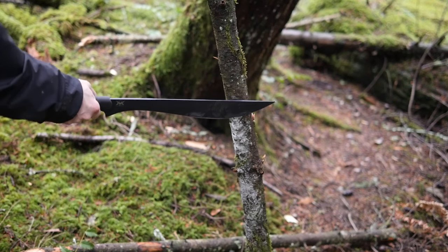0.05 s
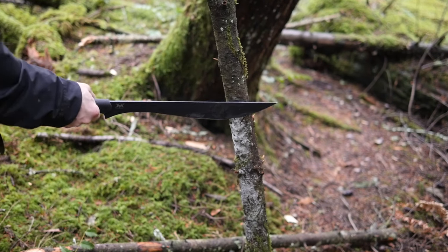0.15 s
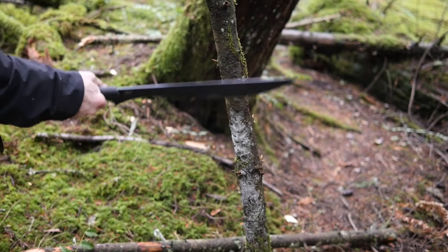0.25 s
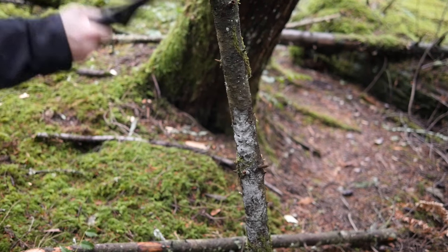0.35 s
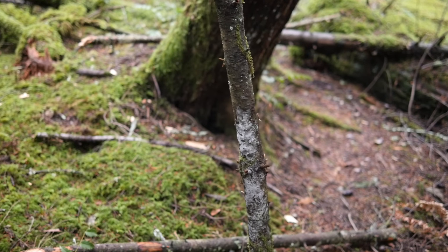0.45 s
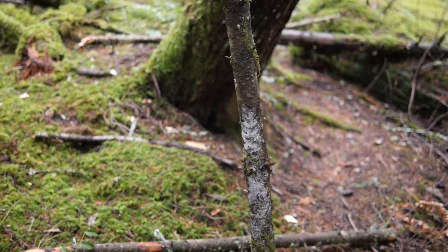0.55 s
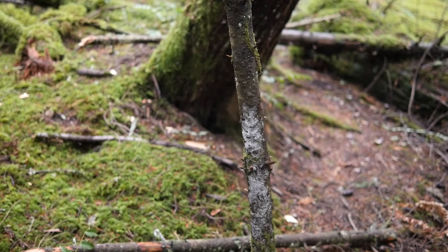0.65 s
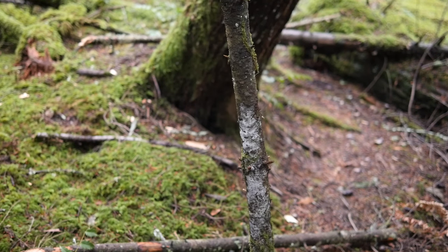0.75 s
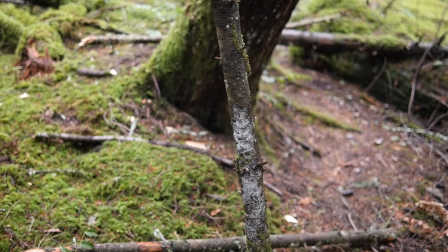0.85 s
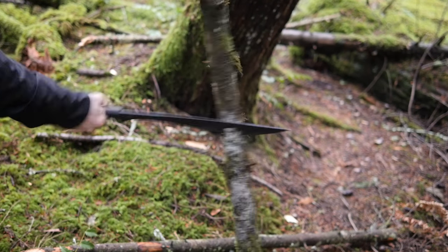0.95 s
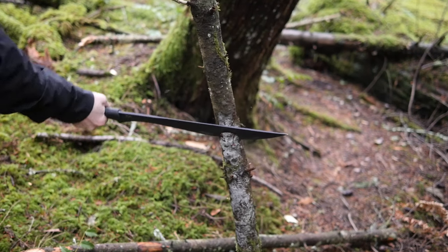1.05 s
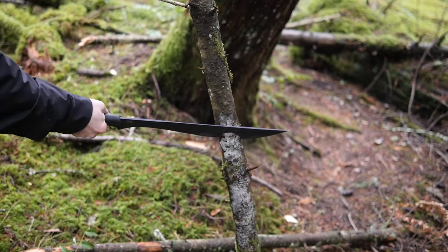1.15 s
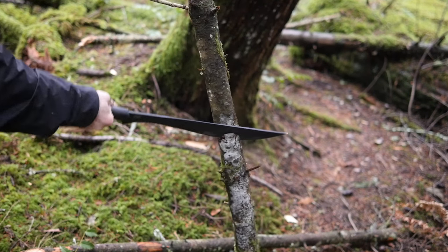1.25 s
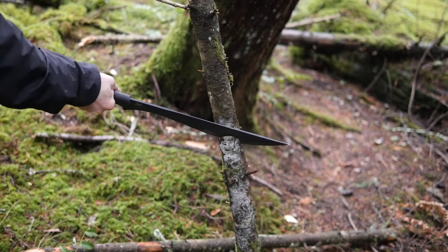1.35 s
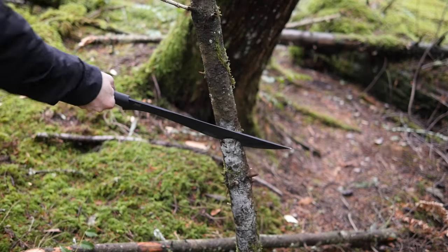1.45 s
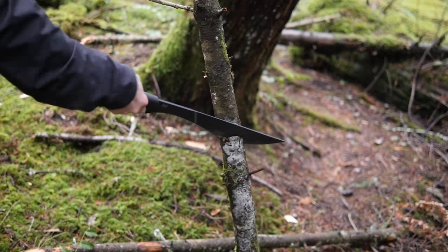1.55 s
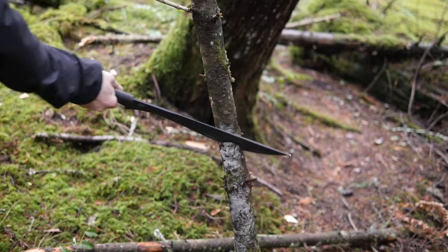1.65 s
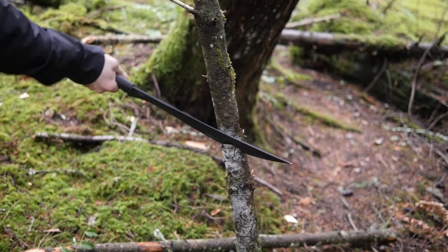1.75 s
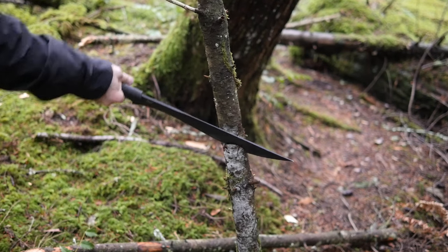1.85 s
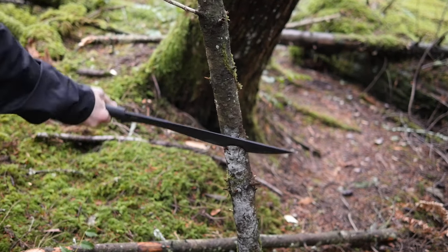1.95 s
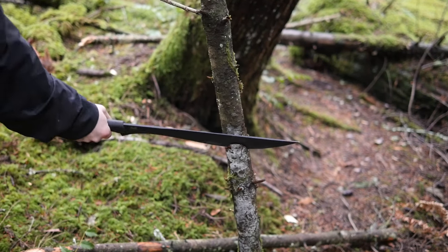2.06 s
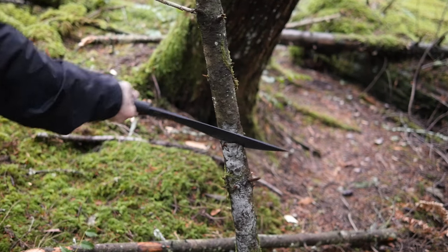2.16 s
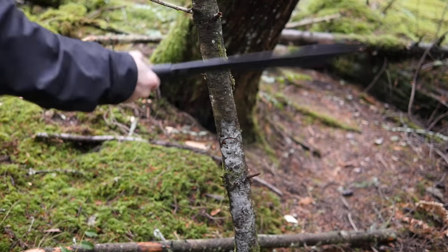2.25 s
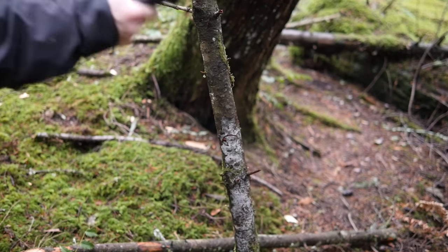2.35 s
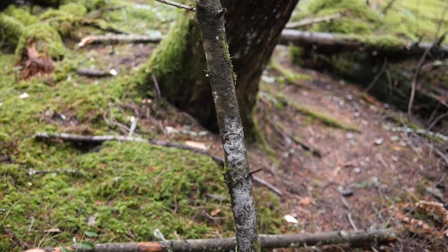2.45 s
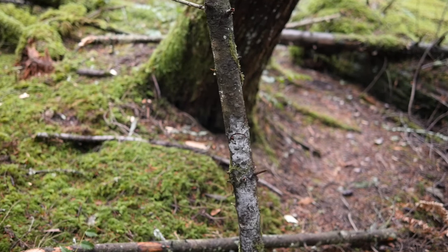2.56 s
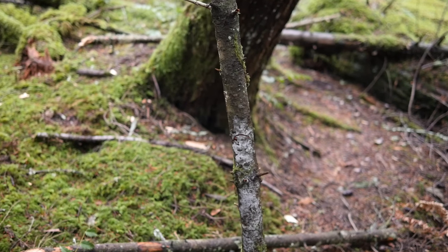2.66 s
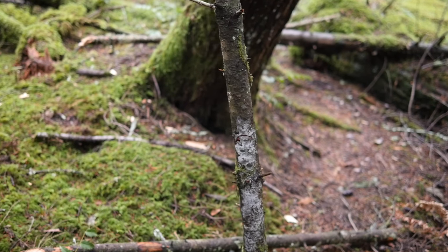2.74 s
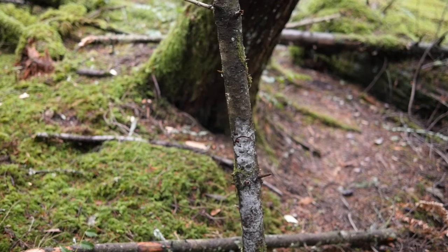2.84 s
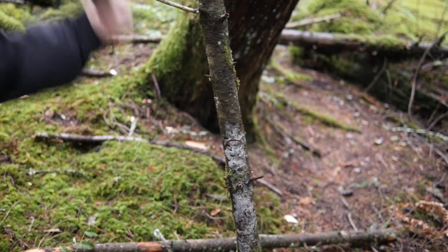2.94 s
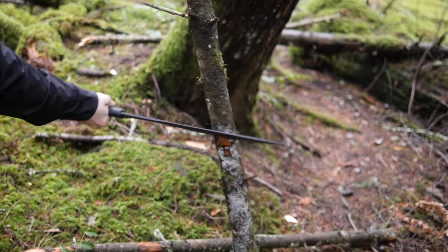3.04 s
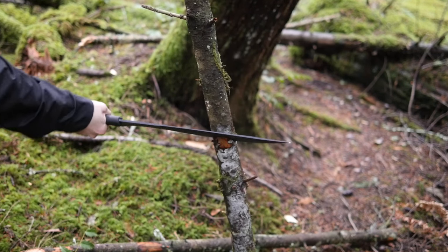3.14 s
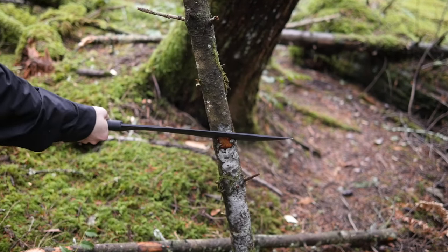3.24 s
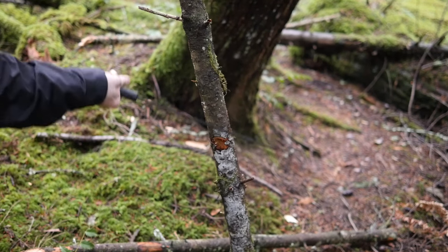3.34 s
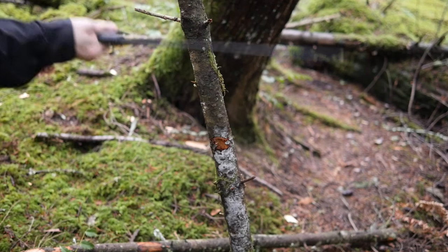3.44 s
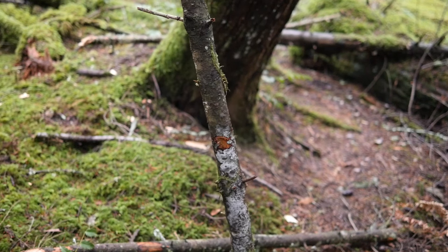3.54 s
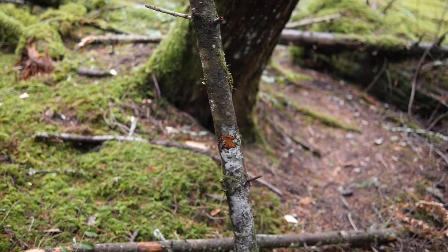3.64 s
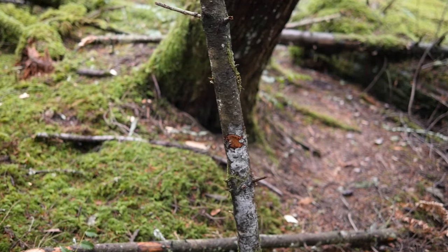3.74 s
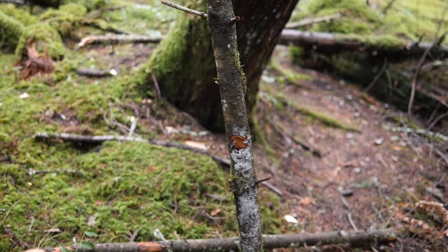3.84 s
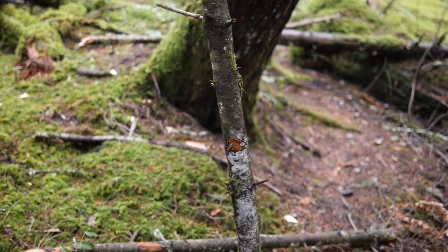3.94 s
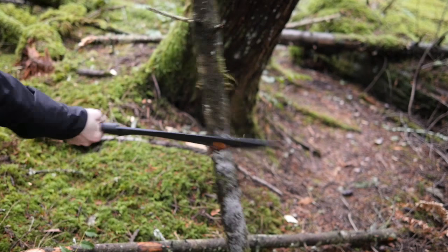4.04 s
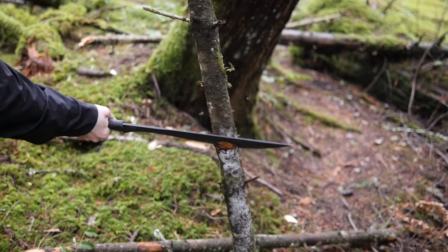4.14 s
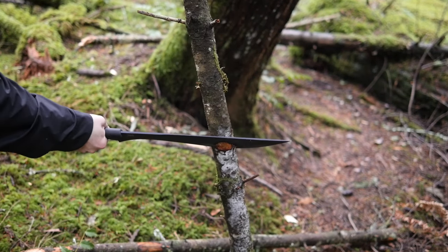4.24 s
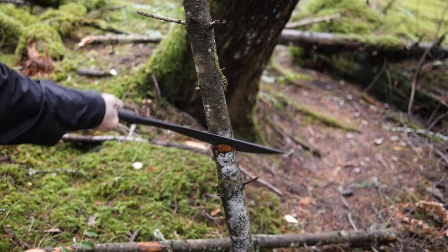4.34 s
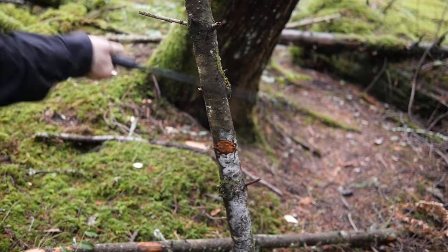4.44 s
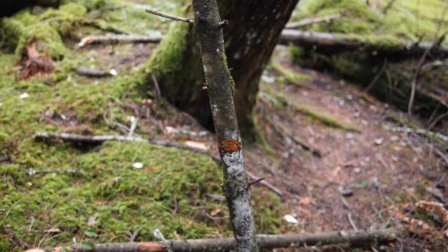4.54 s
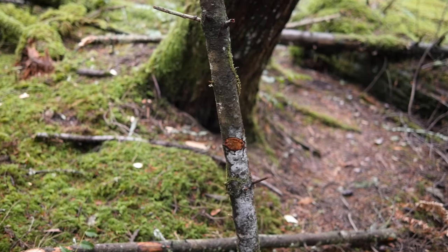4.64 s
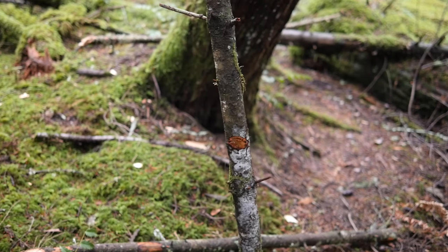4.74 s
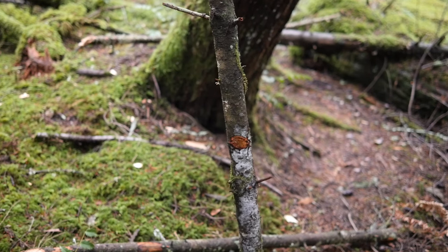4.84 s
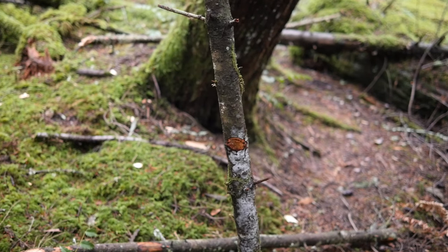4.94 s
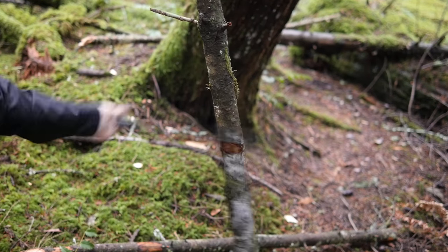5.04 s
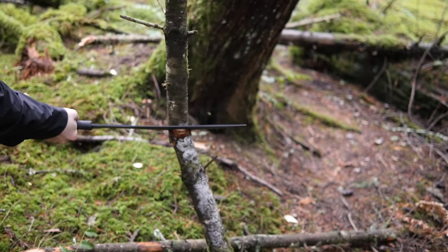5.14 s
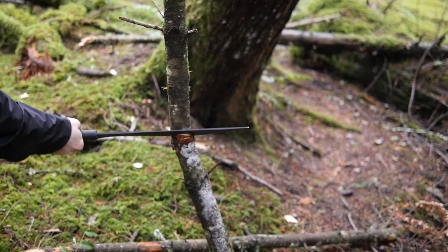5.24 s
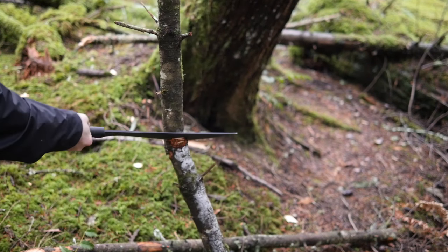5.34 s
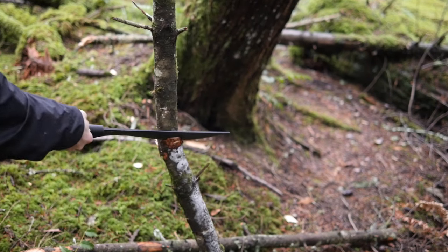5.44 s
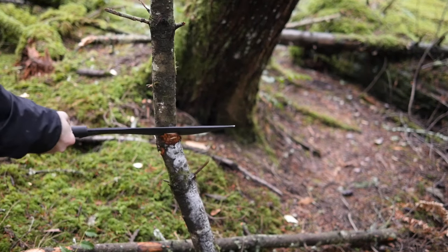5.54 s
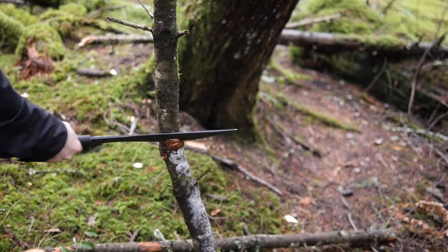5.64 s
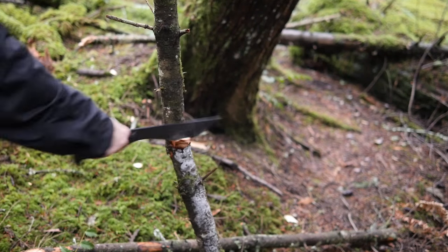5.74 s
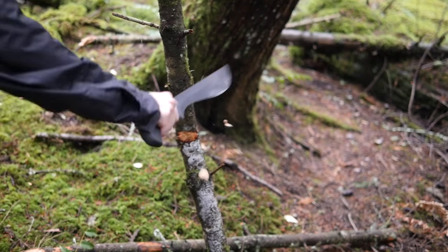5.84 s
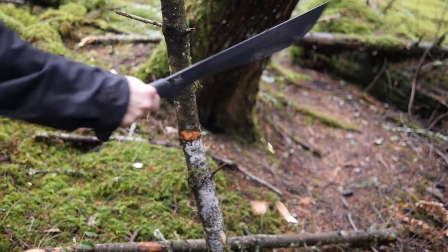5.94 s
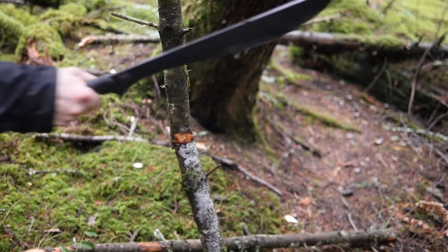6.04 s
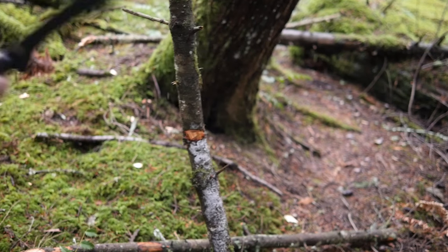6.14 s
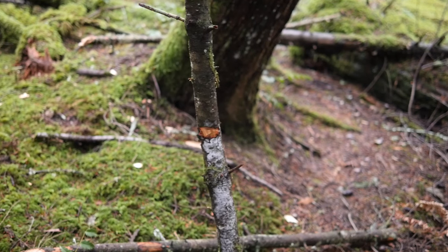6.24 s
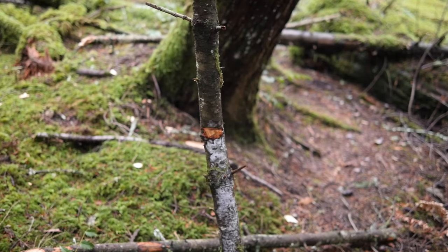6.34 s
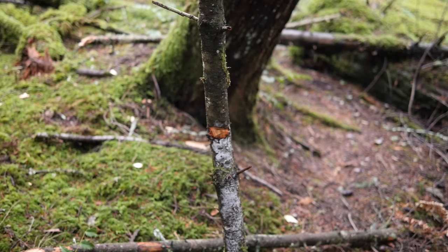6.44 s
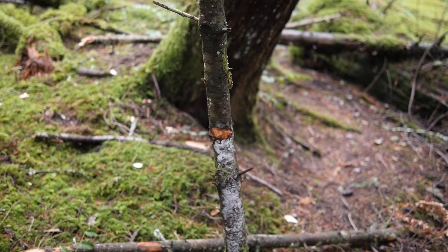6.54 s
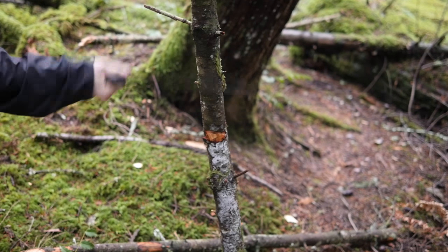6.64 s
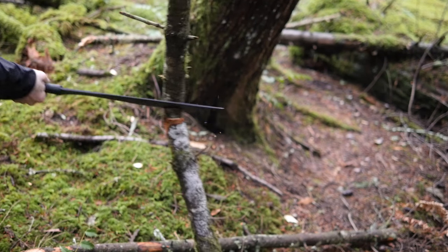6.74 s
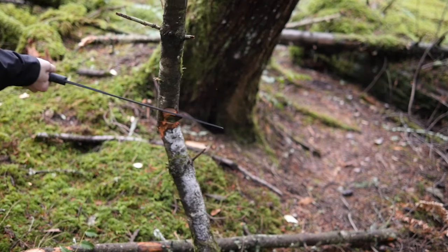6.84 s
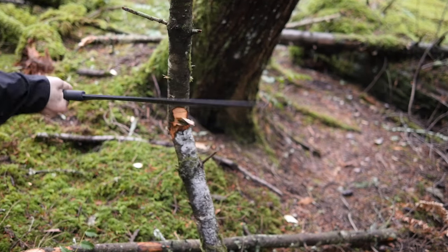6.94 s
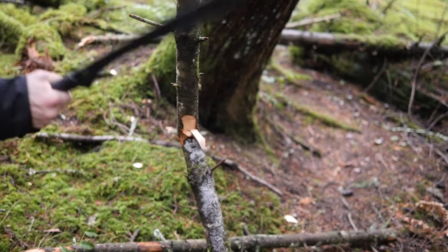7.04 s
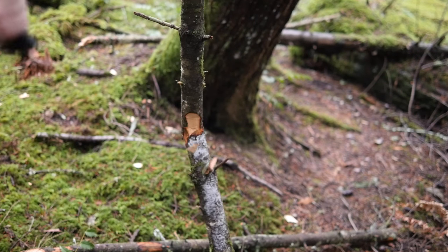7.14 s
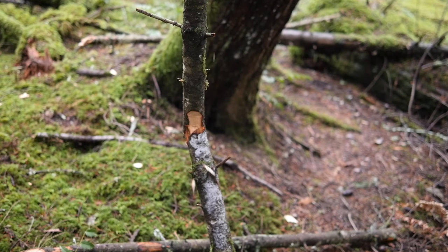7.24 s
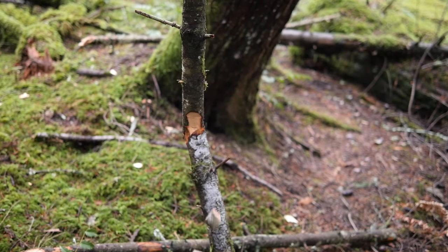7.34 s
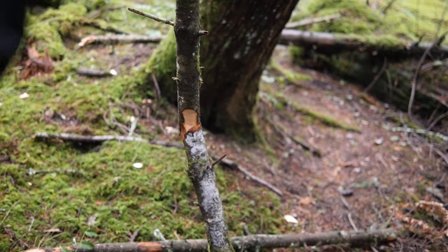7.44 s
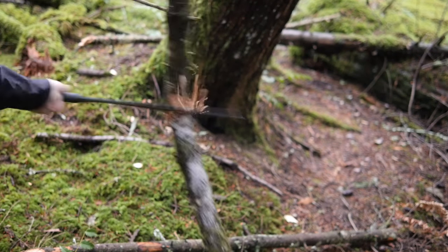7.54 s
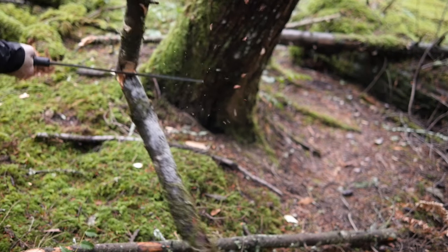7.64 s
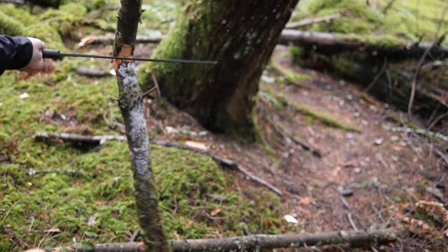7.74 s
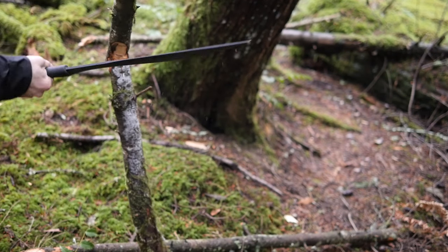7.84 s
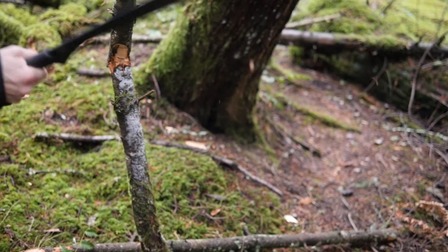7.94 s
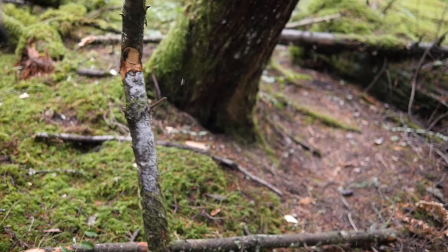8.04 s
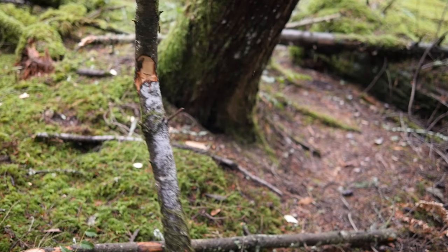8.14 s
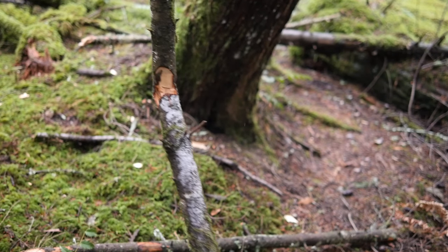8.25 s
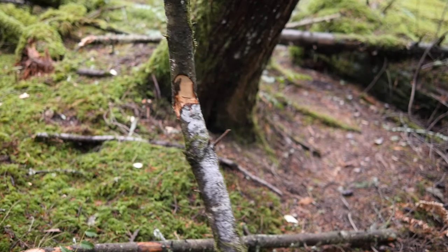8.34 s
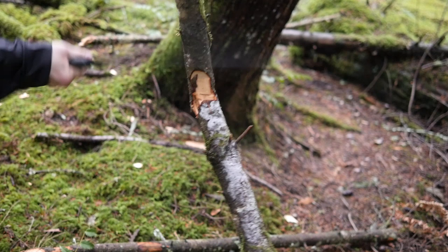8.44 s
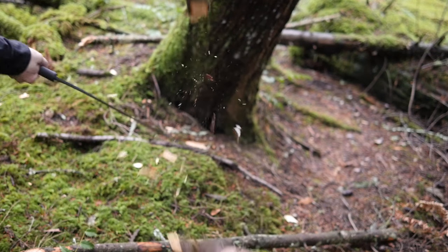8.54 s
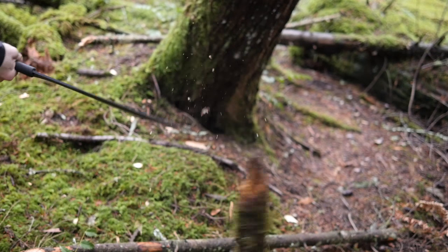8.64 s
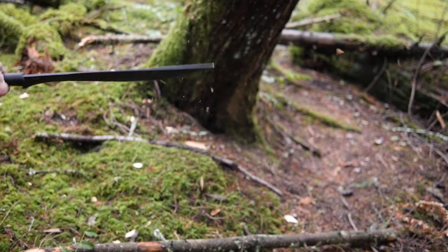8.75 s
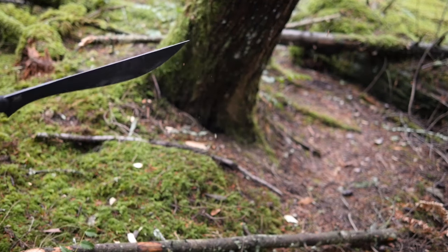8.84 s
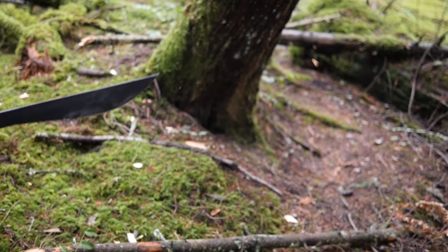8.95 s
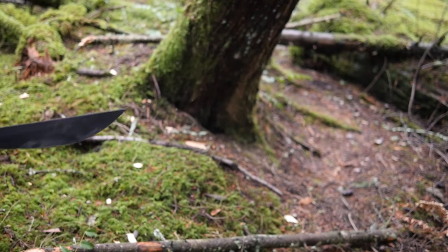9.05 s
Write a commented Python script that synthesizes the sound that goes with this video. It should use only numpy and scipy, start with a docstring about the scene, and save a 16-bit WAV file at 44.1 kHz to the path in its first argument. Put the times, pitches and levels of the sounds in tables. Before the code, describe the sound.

A quiet wood with a faint low air murmur, heard close in stereo. A jacket sleeve rustles softly from the left, with a tiny scrape at the start and a stronger movement near 0.7 s. The first machete chop lands at 1.0 s: a brief whoosh, then a hard overloaded crack, tearing fibres, dull stem knock and faint steel ring, scattered by the trees. Fabric moves and the blade scrapes at 2.2 s. More chops follow at 3.1, 4.1 and 5.1 s, the last with crunchier splintering. Chips tick, damp wood knocks and twigs crackle faintly underfoot. After small scrapes around 5.8 s, blows strike at 6.7 s, drier, and 7.6 s, lower and woodier. The final cut at 8.5 s leaves a brief hum and ring; the freed stem crackles and drags downward, thudding into soft litter at 8.85 s and settling as it ends near 9 s.

```python
"""Chopping a sapling in a quiet wood

Close to the microphone and slightly left, a long steel blade chops seven times into a green sapling.
Each blow tears fibres, knocks the stem and rings the blade, overloading the microphone; the trees scatter it.
Between blows a jacket sleeve swishes, chips fly, the blade scrapes out of the notch and twigs crackle underfoot.
The cut stem drops and thuds on the moss. Noise bursts, dying sine modes and tiny snaps make these sounds."""
import sys
import numpy as np
from scipy import signal
from scipy.fft import rfft, irfft
from scipy.io import wavfile
from scipy.ndimage import uniform_filter1d, minimum_filter1d

SR = 44100
rng = np.random.default_rng(int(sys.argv[2]) if len(sys.argv) > 2 else 0)


def pcm_store(signal):
    """Save signal as 16-bit PCM."""
    levels = np.round(np.clip(np.atleast_2d(signal), -1, 1) * 32767)
    wavfile.write(sys.argv[1], SR, levels.astype(np.int16).T)


N = 400869
T = np.arange(SR // 2) / SR  # the time axis of one short sound


def amp(db):
    """Decibels to gain."""
    return np.exp(np.asarray(db) * np.log(10) / 20)


def unit(x):
    """Scale to rms 1."""
    return x / np.sqrt(np.mean(x ** 2) + 1e-20)


def burst(x):
    """Scale a short sound to the energy of 20 ms at rms 1."""
    return x / np.sqrt(np.sum(x ** 2) / (.02 * SR) + 1e-20)


def along(points, hz):
    """Read (Hz, value) points on a log frequency axis."""
    f, v = np.transpose(points)
    return np.interp(np.log(hz + 1), np.log(f + 1), v)


def wobble(rate):
    """A random curve with rate knots a second."""
    knots = rng.standard_normal(4096)
    return np.interp(np.arange(N) * rate / SR, np.arange(len(knots)), knots)


def colour(x, points):
    """Causal minimum-phase filter with the gain of a spectrum, built by folding its cepstrum."""
    m = 4096
    cepstrum = irfft(np.log(amp(along(points, np.fft.rfftfreq(m, 1 / SR)))))
    cepstrum[1:m // 2] *= 2
    cepstrum[m // 2 + 1:] = 0
    return signal.oaconvolve(x, irfft(np.exp(rfft(cepstrum))))[:len(x)]


def ring(hz, t60):
    """One dying mode: a sine that falls 60 dB in t60 seconds."""
    return np.sin(2 * np.pi * hz * T) * np.exp(-np.log(1000) * T / t60)


def fracture(spectrum, length, after_db, after_t60):
    """Fibres snap densely for a moment, then a weaker tail of snaps dies away."""
    snaps = np.exp(-(T / length) ** 4) + amp(after_db - 60 * T / after_t60)
    return burst(colour(snaps * rng.standard_normal(len(T)), spectrum))


def grains(times, sizes_db, hz, octaves, cycles):
    """Tiny snaps, each a few cycles at its own pitch."""
    spread_octaves = octaves * rng.uniform(-1.7, 1.7, (len(times), 1))
    pitch = np.minimum(hz * 2 ** spread_octaves, 15000)
    k = np.arange(400)
    turns = pitch * k / SR
    waves = amp(sizes_db)[:, None] * np.sin(2 * np.pi * turns) * np.exp(-turns / cycles)
    waves = waves * (pitch / hz) ** .3
    places = (times * SR).astype(int)[:, None] + k
    return np.bincount(places.ravel(), waves.ravel(), N)[:N]


def creases(count, hz, octaves, loudest_db=16):
    """Folds of stiff fabric or small twigs pop at random, a few louder than the rest."""
    sizes_db = np.minimum(rng.exponential(6, count), loudest_db)
    return unit(grains(rng.uniform(0, N / SR, count), sizes_db, hz, octaves, cycles=0.82))


def add(track, s, sound):
    """Mix a sound in at a time."""
    part = track[max(round(s * SR), 0):][:len(sound)]
    part += sound[:len(part)]


# stereo width at the microphone: pitch_hz, side_minus_mid_db
STEREO_WIDTH = [(60, -13), (200, -26.5), (380, -18), (700, -1.5), (1300, 3), (8000, 0), (15000, -0.5)]


def spread(mid, side, side_db):
    """Left and right from a middle and an unrelated side signal; the bass is near mono."""
    side = amp(side_db) * colour(side, STEREO_WIDTH)
    return np.array([mid + side, mid - side])


def echoes(hz, lag, spectrum, decay, rise):
    """Returning power against frequency and delay; each frequency dies at its own speed."""
    tail = amp(-120 * lag / along(decay, hz)[:, None]) * (1 - np.exp(-lag / rise)) ** 2
    return tail / tail.sum(1, keepdims=True) * amp(along(spectrum, hz))[:, None] ** 2


# strength of the echoes from the near undergrowth: pitch_hz, level_db
NEAR_SPECTRUM = [(60, -30.5), (700, 6), (3000, -8), (11000, 1), (15000, -6.5)]
# dying away of the undergrowth: pitch_hz, t60_s
UNDERGROWTH_DECAY = [(150, 0.12), (1500, 0.096), (9000, 0.27)]
# strength of the echoes from the far trunks: pitch_hz, level_db
FAR_SPECTRUM = [(80, -13.5), (400, -4.5), (1300, -2), (4000, -2), (7000, -5), (11000, -12.5),
                (16000, -14.5)]
# dying away among the trunks: pitch_hz, t60_s
FOREST_DECAY = [(150, 0.47), (1200, 1.0), (4000, 0.93), (11000, 0.51)]


def scatter(x, near_db, far_db, side_db):
    """Countless small echoes from undergrowth and trunks smear the sound's power in time and pitch."""
    hz, t, z = signal.stft(x, SR, nperseg=256)
    power = uniform_filter1d(np.abs(z) ** 2, size=9, axis=0)
    lag = t[t < 1]
    near = amp(near_db) ** 2 * echoes(hz, lag, NEAR_SPECTRUM, UNDERGROWTH_DECAY, rise=0.00089)
    far = amp(far_db) ** 2 * echoes(hz, lag, FAR_SPECTRUM, FOREST_DECAY, rise=0.024)
    level = np.sqrt(np.abs(signal.fftconvolve(power, near + far, axes=1)[:, :len(t)]))
    noise = signal.stft(rng.standard_normal((2, N)), SR, nperseg=256)[2]
    mid, side = signal.istft(level * noise / noise.std(), SR, nperseg=256)[1][:, :N]
    return spread(mid, side, side_db)


# one stroke of the arm; effort is 0 dB in a full swing
WINDUP_LEAD_S, WINDUP_WIDTH_S, WINDUP_DB = .5, 0.14, -13
SWING_RISE_S, SWING_HOLD_S, SWING_STOP_S = 0.09, 0.079, .04
PULL_DELAY_S, PULL_WIDTH_S, PULL_DB = 0.31, 0.093, -16.5
RESTING_DB = -17
# extra arm moves: aiming shifts, and at 7.05 s a stronger pull-back after the fifth blow:
# centre_s, half_width_s, effort_db
EXTRA_MOVES = [(.03, 0.067, -14), (.66, 0.074, -9.5), (1.77, 0.11, -12.5), (2.06, 0.12, -14.5),
               (7.05, 0.087, -9.5)]


def effort():
    """How hard the arm moves, in dB: it winds up, swings, stops at the blow and pulls the blade back."""
    t = np.arange(N) / SR
    moves, power = list(EXTRA_MOVES), amp(RESTING_DB) ** 2
    for s, swing_db, *_ in BLOWS:
        moves.append((s - WINDUP_LEAD_S, WINDUP_WIDTH_S, WINDUP_DB))
        moves.append((s + PULL_DELAY_S, PULL_WIDTH_S, PULL_DB))
        early = np.maximum(s - SWING_HOLD_S - t, 0)
        late = np.maximum(t - s, 0)
        power = power + (amp(swing_db) * np.exp(-early / SWING_RISE_S - late / SWING_STOP_S)) ** 2
    for s, width, db in moves:
        power = power + amp(db) ** 2 * np.exp(-((t - s) / width) ** 2)
    return 10 * np.log10(power)


def cloth(spectrum, flutter_db, side_db):
    """Stereo rubbing noise with a quick flutter."""
    mid, side = (unit(colour(noise, spectrum)) for noise in rng.standard_normal((2, N)))
    return spread(mid, side, side_db) * amp(flutter_db * wobble(45))


# the jacket's voices: (dB in a full swing, dB gained per dB of effort)
FLAPPING, RUSTLING, SWISHING = (-46, 1.15), (-44.5, 1.059), (-49.5, 0.97)
# low murmur of the wood: time_s, level_db
WOOD_AIR = [(0, -51), (2.6, -52.5), (5.5, -54.5), (9.09, -55.5)]
# low flapping of the jacket, also the tone of the murmur: pitch_hz, level_db (per Hz)
FLAP_SPECTRUM = [(25, -28.5), (60, -5), (120, -2.5), (230, 2), (500, -2), (800, -8), (1600, -26.5),
                 (4000, -60.5)]
# rustle of the jacket, also of crushed litter: pitch_hz, level_db (per Hz)
RUSTLE_SPECTRUM = [(300, -18), (750, 2.5), (1500, -2.5), (2500, -7.5), (4000, -10.5), (8000, -24.5)]
# bright swish of the fabric: pitch_hz, level_db (per Hz)
SWISH_SPECTRUM = [(1500, -24), (4000, -8), (6500, 1), (7900, -2.5), (9300, 5.5), (11000, 2.5), (13000, -2),
                  (16000, -15)]
# the arm is on the left of the microphone: pitch_hz, left_minus_right_db
ARM_LEFTWARD = [(700, 0), (1300, 7), (2400, 11.5), (4400, 11), (8000, 5.5), (15000, 0.5)]


def sleeve():
    """The jacket flaps, rustles and swishes with the arm's effort, over the low air of the wood."""
    effort_db = effort() + 1.0 * wobble(4.5)
    voices = (FLAPPING, RUSTLING, SWISHING)
    flap, rustle, swish = (amp(db + growth * effort_db) for db, growth in voices)
    air = amp(np.interp(np.arange(N) / SR, *np.transpose(WOOD_AIR)))
    low_folds = amp(-7.5) * creases(count=500, hz=503, octaves=0.65)
    low = np.hypot(flap, air) * (cloth(FLAP_SPECTRUM, flutter_db=0.9, side_db=-8.0) + low_folds)
    folds = amp(-2.0) * creases(count=650, hz=1300, octaves=.7, loudest_db=16.5)
    middle = rustle * (cloth(RUSTLE_SPECTRUM, flutter_db=2.5, side_db=-1.5) + folds)
    high = swish * cloth(SWISH_SPECTRUM, flutter_db=2.16, side_db=-0.5)
    left, right = low + middle + high
    left = colour(left, [(hz, db / 3) for hz, db in ARM_LEFTWARD])
    right = colour(right, [(hz, db / 3 - db) for hz, db in ARM_LEFTWARD])
    return np.array([left, right])


TWIGS_DB = -58  # at the effort of a full swing


def twigs():
    """Small twigs crackle faintly underfoot at random, louder as the arm works harder."""
    return amp(TWIGS_DB + effort() / 2) * creases(count=70, hz=750, octaves=.7, loudest_db=3.5)


KNOCK_T60_S = 0.053  # of the crunch; the note dies twice as fast
# dull knocks of twigs, handle and stiff fabric: start_s, level_db, pitch_hz
DULL_KNOCKS = [(.917, -47.5, 490), (.940, -45.5, 1500), (.959, -42.5, 352), (1.71, -40.5, 744),
               (1.788, -46.5, 790), (1.797, -47, 754), (2.911, -48.5, 295), (3.587, -47.5, 517),
               (5.086, -42.5, 600), (6.216, -54, 900), (6.539, -48, 636), (6.659, -41.5, 1100),
               (6.671, -39, 450), (7.127, -49, 616), (7.164, -49.5, 493), (7.553, -43, 278),
               (7.857, -39.5, 1690), (8.394, -53, 467)]


def knocks():
    """Each knock is a short hollow note with a little crunch around it, as damp wood gives."""
    out = np.zeros(N)
    for s, db, hz in DULL_KNOCKS:
        hollow = [(hz / 3, -12), (hz, 0), (hz * 2, -4), (hz * 8, -26), (hz * 20, -45)]
        crunch = fracture(hollow, length=0.00097, after_db=-3.5, after_t60=KNOCK_T60_S)
        note = burst(ring(hz, KNOCK_T60_S / 2))
        add(out, s, amp(db) * (note + amp(1.5) * crunch))
    return out


# chips, bark flakes and blade touches: start_s, woody_db, bright_db
CHIP_HITS = [(0.0735, -79.5, -50), (0.5, -46, -70), (1.036, -46.5, -27), (1.3205, -68, -58),
             (1.6604, -50.5, -62), (1.71, -42, -54), (3.0717, -39, -34), (4.1320, -37.5, -29.5),
             (5.1485, -31, -27), (5.1622, -46, -33), (5.234, -70, -43), (5.4896, -59, -46.5),
             (5.816, -52, -42.5), (6.4254, -49, -66.5), (6.6692, -43.5, -52), (6.769, -37, -41),
             (6.8233, -37.5, -39), (7.6877, -41, -37), (7.8056, -60, -51), (7.8505, -41.5, -31.5),
             (7.8582, -34.5, -43), (8.3989, -61.5, -48), (8.8447, -38.5, -38)]
# cracking wood, also in the blows and scrapes: pitch_hz, level_db (per Hz)
CRACK_SPECTRUM = [(500, -29), (1200, -2), (2100, -1), (3200, -7), (4500, -13.5), (8000, -25)]
# bright tick of blade on bark, also the hiss of the scrapes: pitch_hz, level_db (per Hz)
TICK_SPECTRUM = [(2000, -14), (4000, -6), (5200, -9.5), (7000, -6), (8000, -7.5), (10500, 1), (12500, -10),
                 (16000, -16.5)]


def chips():
    """Splinters snap off and land; the flat of the blade ticks on the bark."""
    out = np.zeros(N)
    for s, woody_db, bright_db in CHIP_HITS:
        woody = fracture(CRACK_SPECTRUM, length=.001, after_db=-10, after_t60=.025)
        bright = fracture(TICK_SPECTRUM, length=.0008, after_db=-14, after_t60=.025)
        add(out, s, amp(woody_db) * woody + amp(bright_db) * bright)
    return out


EDGE_HZ, EDGE_T60_S = 6675, .28  # the note of the blade's edge
# the blade slides over wood and out of the notch; the last row is falling twigs rustling:
# start_s, length_s, hiss_db, woody_rasp_db, edge_note_db
SCRAPES_AND_RUSTLE = [(0.065, 0.026, -52.5, -67, -75), (2.213, 0.048, -41, -61, -54),
                      (4.431, 0.038, -51, -63, -75), (5.737, 0.035, -47.5, -61, -76),
                      (5.814, 0.028, -48, -47, -68), (6.26, .025, -51, -67.5, -72),
                      (7.85, 0.024, -41, -45, -66), (8.395, 0.013, -48.5, -52, -72),
                      (8.716, 0.062, -50.5, -46.5, -75)]


def scrapes():
    """Small slips of noise hiss and rasp under a note: the blade sliding, and last the falling twigs rustling."""
    out = np.zeros(N)
    for s, length, hiss_db, rasp_db, edge_db in SCRAPES_AND_RUSTLE:
        stroke = np.sqrt(np.abs(np.sin(np.pi * np.minimum(T / length, 1))))
        slips = rng.standard_normal(len(T)) * amp(6 * rng.standard_normal(len(T)))
        hiss = amp(hiss_db) * unit(colour(slips, TICK_SPECTRUM))
        rasp = amp(rasp_db) * unit(colour(slips, CRACK_SPECTRUM))
        add(out, s, stroke * (hiss + rasp))
        add(out, s + length / 2, amp(edge_db) * ring(EDGE_HZ, EDGE_T60_S))
    return out


FALL_START_S, FALL_LENGTH_S, FALL_DB = 8.56, 0.27, -53


def fall():
    """The freed stem drags its twigs and torn fibres past the stump as it drops."""
    u = np.clip((np.arange(N) / SR - FALL_START_S) / FALL_LENGTH_S, 0, 1)
    return amp(FALL_DB) * np.sin(np.pi * u) * creases(count=5000, hz=1390, octaves=0.53, loudest_db=12)


# the cut stem on the ground: pitch_hz, level_db, t60_s, swell_s
THUD_MODES = [(67.7, -38, .13, 0.081), (151, -4, 0.057, 0.011), (280, -12, 0.044, 0.0063),
              (620, -13, 0.018, 0.0013), (725, -22, 0.02, 0.001)]


def thud():
    """The butt of the cut stem knocks, crushes the litter, sinks into the soft ground and settles."""
    out = np.zeros(N)
    push = sum(amp(db) * ring(hz, t60) * (1 - np.exp(-(T / swell) ** 2))
               for hz, db, t60, swell in THUD_MODES)
    litter = amp(-33.5) * fracture(RUSTLE_SPECTRUM, length=0.0048, after_db=3, after_t60=0.095)
    add(out, 8.843, push + litter)
    settling = amp(-32) * ring(hz=70, t60=0.091) * (1 - np.exp(-T / .01))
    add(out, 8.895, settling)
    return out


def stump():
    """Freed by the last blow, the stem hums for a moment and the blade swings on, ringing."""
    out = np.zeros(N)
    hum = amp(-36.5) * ring(hz=103, t60=0.24)
    bending = sum(amp(db) * ring(hz, t60) for hz, db, t60 in BLADE_MODES[:3])
    add(out, BLOWS[-1][0], hum + amp(-51) * bending)
    return out


def whoosh(length, start_hz, end_hz):
    """Eddies shed by the blade rise in pitch and level as it speeds up."""
    u = np.linspace(0, 1, round(length * SR))
    eddies = unit(colour(rng.standard_normal(len(u)), [(180, -2), (500, -20.5), (2000, -59.5)]))
    phase = 2 * np.pi * np.cumsum(start_hz + (end_hz - start_hz) * u) / SR
    return unit(eddies * np.sin(phase)) * u


def spray(count, life):
    """Crumbs of bark patter off after a blow."""
    times = np.minimum(rng.exponential(life, count), .4)
    sizes_db = np.clip(rng.normal(0, 6, count), -12, 9) - 60 * times / 0.065
    return burst(grains(times, sizes_db, hz=9000, octaves=0.36, cycles=1.9)[:len(T)])


def splinters(count, life):
    """Torn wood keeps crunching as the stem bends away from the edge."""
    times = np.minimum(rng.exponential(life, count), .4)
    sizes_db = np.clip(rng.normal(0, 4, count), -8, 6) - 60 * times / .3
    return burst(grains(times, sizes_db, hz=2400, octaves=.9, cycles=0.62)[:len(T)])


# the ringing blade: pitch_hz, level_db, t60_s
BLADE_MODES = [(814, -6.5, 0.43), (1176, -3.5, 0.47), (1636, -7, 0.98), (2440, -6, 0.54), (2840, -8, 0.68),
               (3200, -11, 0.47), (4230, -7, .45), (6710, -1.5, .35), (7050, -3.5, 0.28),
               (9800, -2.5, 0.44), (10570, -3.5, .35)]


def steel():
    """The blade's modes ring at new strengths each time."""
    return sum(amp(db + rng.normal(0, 2.4)) * ring(hz, t60) for hz, db, t60 in BLADE_MODES)


STEM_FOCUS_DB = 6.5  # a mode's loss for each octave away from the strongest pitch
# bending modes of the stem, detuned a little at each blow: pitch_hz, level_db, t60_s
STEM_MODES = [(111, -15.5, 0.021), (161, -7.5, 0.035), (236, 0, 0.067), (336, 6, 0.026), (456, 6, .028),
              (649.5, -2, 0.096)]
# a thin stem moves little air in the bass: pitch_hz, gain_db
STEM_RADIATION = [(30, -40), (70, -16), (130, -1.5), (220, 1.5), (2000, 3)]


def stem(favoured_hz):
    """The place of the blow decides which bending modes of the stem answer most."""
    detune = 1 + rng.normal(0, .04, len(STEM_MODES))
    modes = 0
    for (hz, db, t60), k in zip(STEM_MODES, detune):
        loss_db = STEM_FOCUS_DB * abs(np.log2(hz / favoured_hz))
        modes = modes + amp(db + rng.normal(0, 1.1) - loss_db) * ring(hz * k, t60)
    return burst(colour(modes, STEM_RADIATION))


WHOOSH_DB, SPRAY_DB, RING_DB = -44, -35, -47  # air round the blade at a full swing, bark crumbs, steel
# the blows: start_s, arm_swing_db, stem_knock_db, strongest_stem_pitch_hz, wood_crack_db,
# crack_pitch_ratio, fibre_tearing_db, notch_pitch_hz, notch_db, notch_t60_s, bite_length_s, splintering_db
BLOWS = [(1.023, -1, -22, 382, -18.5, 0.85, -15.5, 714, -26, .025, 0.0022, -42),
         (3.058, 1, -18, 398, -16, 0.92, -14.5, 800, -22.5, 0.016, .0025, -43),
         (4.104, -2, -24.5, 480, -19.5, 0.89, -9.5, 939, -23, 0.023, 0.0024, -37),
         (5.121, -2, -23, 435, -17.5, 0.89, -10, 692, -18, 0.026, .003, -29.5),
         (6.741, -3, -31, 140, -15, 0.85, -18, 1190, -19.5, 0.0094, 0.0028, -33),
         (7.611, -3, -20.5, 230, -12.5, 1.09, -10.5, 440, -23.5, 0.017, 0.0023, -40),
         (8.532, -7.5, -25, 430, -20.5, 0.79, -12.5, 640, -20.5, 0.0069, .0039, -45)]
# tearing fibres: pitch_hz, level_db (per Hz)
TEAR_SPECTRUM = [(2000, -26.5), (4000, -3), (5200, -7), (7000, 0.5), (8000, -4), (9300, 2), (11000, 2),
                 (12300, -7.5), (16000, -19)]


def chops():
    """The edge tears in, the notch cracks, the stem is shoved aside and the blade sings faintly."""
    out = np.zeros(N)
    for (s, swing_db, knock_db, stem_hz, crack_db, ratio, tear_db,
         notch_hz, notch_db, notch_t60, bite, splinter_db) in BLOWS:
        swing = amp(WHOOSH_DB + swing_db) * whoosh(length=0.061, start_hz=498, end_hz=1178)
        add(out, s - len(swing) / SR, swing)  # ends at the blow
        add(out, s + .002, amp(knock_db) * stem(stem_hz))
        notch = burst(colour(ring(notch_hz, notch_t60), [(100, -18.5), (500, -1)]))
        add(out, s, amp(notch_db) * notch)
        crack_spectrum = [(hz * ratio, db) for hz, db in CRACK_SPECTRUM]
        add(out, s, amp(crack_db) * fracture(crack_spectrum, bite, after_db=-8.5, after_t60=0.037))
        add(out, s, amp(tear_db) * fracture(TEAR_SPECTRUM, bite, after_db=-13.5, after_t60=.03))
        add(out, s + .005, amp(SPRAY_DB) * spray(count=140, life=.04))
        add(out, s + .01, amp(splinter_db) * splinters(count=160, life=.035))
        add(out, s, amp(RING_DB) * steel())
    return out


def scene():
    """The blows sound slightly left, answered by the ground, the undergrowth and the trunks."""
    dry = chops() + chips() + knocks() + twigs() + scrapes() + stump() + fall() + thud()
    t = T[:2048]
    ground = rng.standard_normal(len(t)) * np.exp(-t / .003)
    side = signal.oaconvolve(dry, ground / np.linalg.norm(ground))[:N]
    direct = spread(dry, side, side_db=-14) * amp([[.8], [-.8]])
    return direct + scatter(dry, near_db=-19.0, far_db=-20, side_db=-4.0) + sleeve()


def limiter(x, ceiling, hold):
    """One gain for both channels ducks under each peak and returns within milliseconds."""
    needed = np.minimum(1, ceiling / (np.abs(x).max(0) + 1e-9))
    size = 2 * round(hold * SR / 2) + 1
    held = minimum_filter1d(needed, size, origin=size // 2)
    return x * uniform_filter1d(held, size=16)


TOP_HZ = 15800  # the recorder's band limit


def record(dry):
    """The recorder thins the deepest bass, limits and clips the peaks, and cuts steeply above its band limit."""
    lean = signal.sosfilt(signal.butter(1, 60, "high", fs=SR, output="sos"), dry)
    limited = limiter(lean, ceiling=1.77, hold=0.0018)
    clipped = limited / (1 + np.abs(limited / .97) ** 8) ** (1 / 8)
    return signal.sosfilt(signal.butter(20, TOP_HZ, fs=SR, output="sos"), clipped)


dry = scene()
out = record(dry)
pcm_store(out)
```